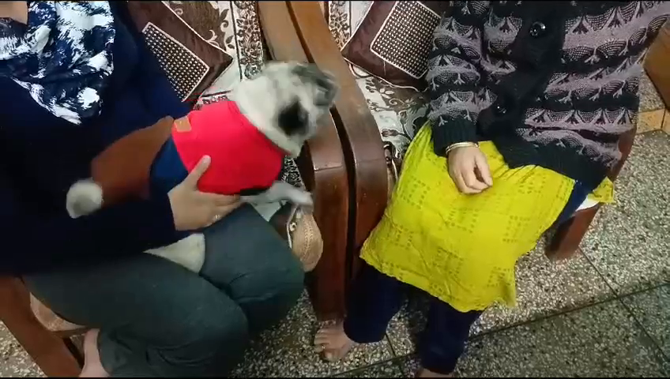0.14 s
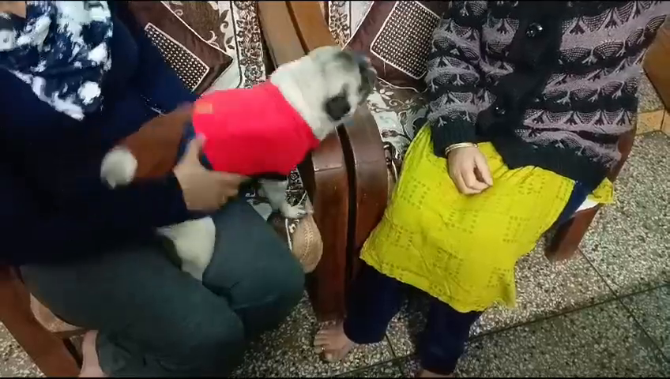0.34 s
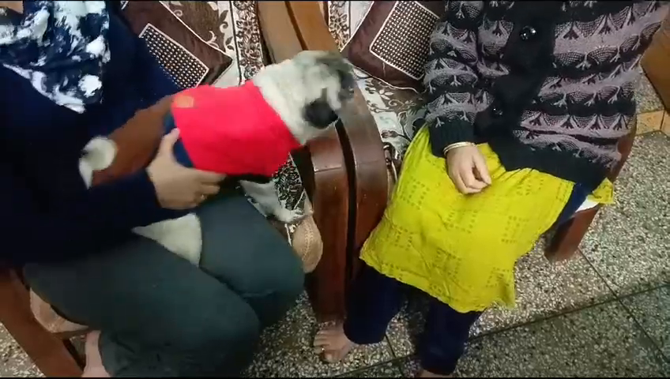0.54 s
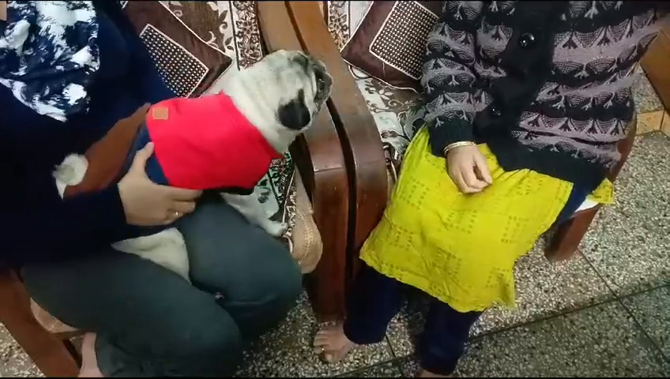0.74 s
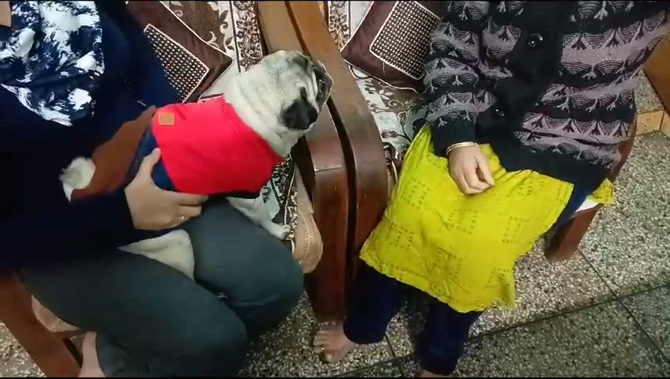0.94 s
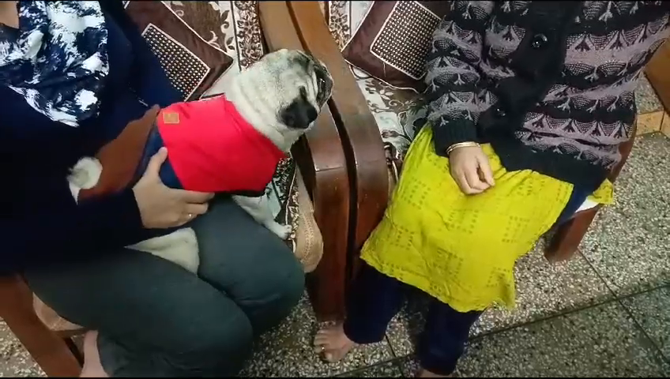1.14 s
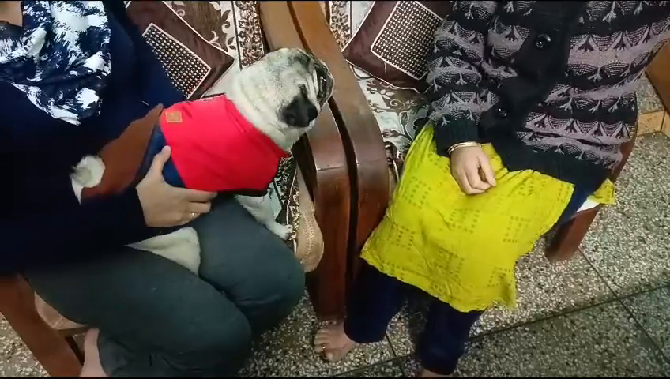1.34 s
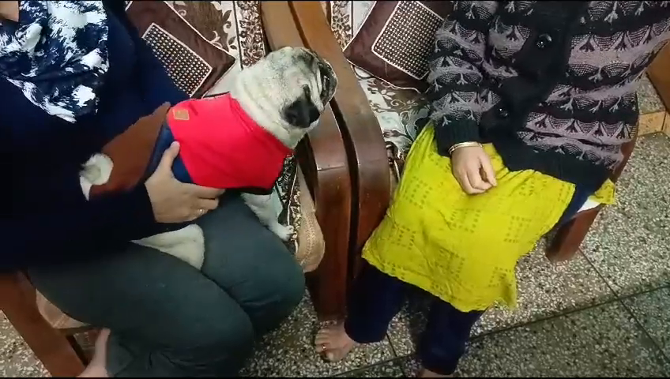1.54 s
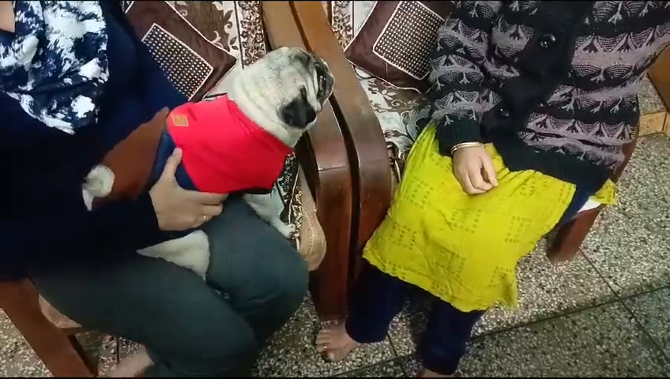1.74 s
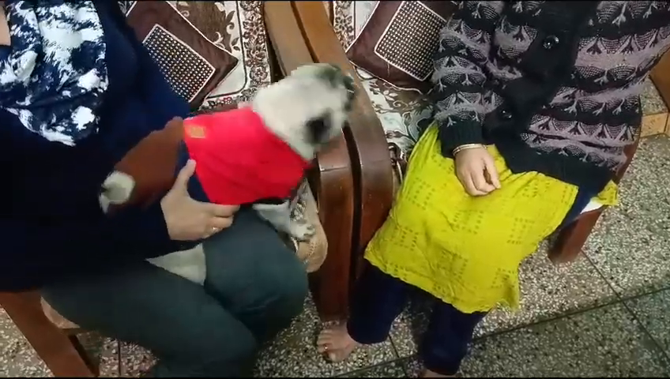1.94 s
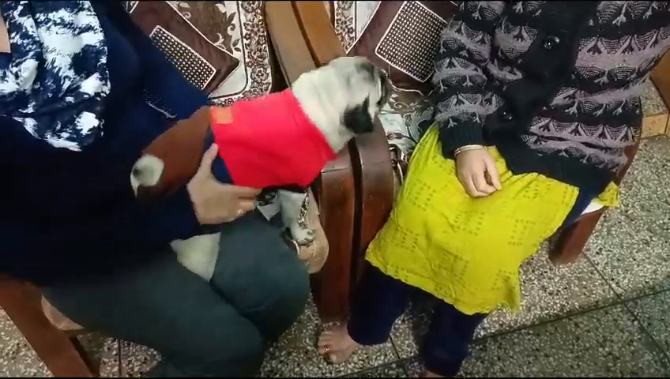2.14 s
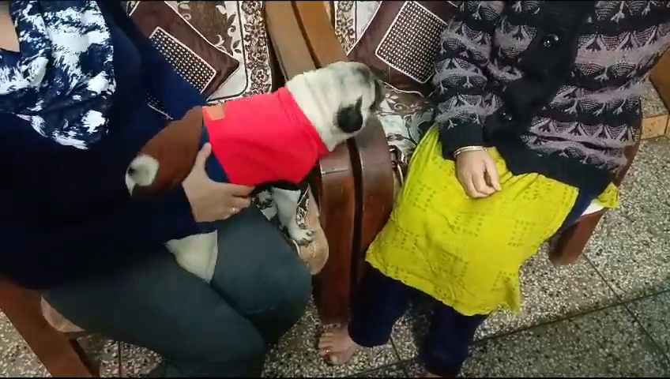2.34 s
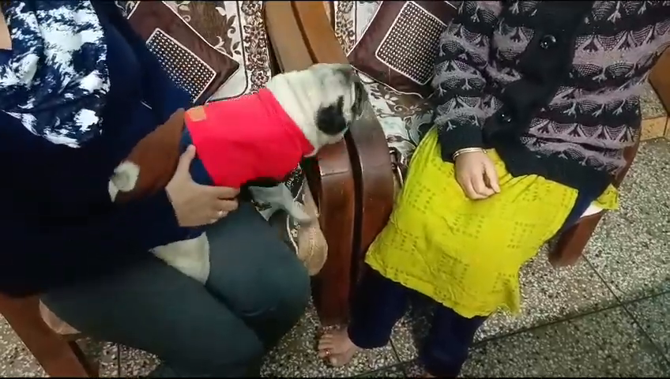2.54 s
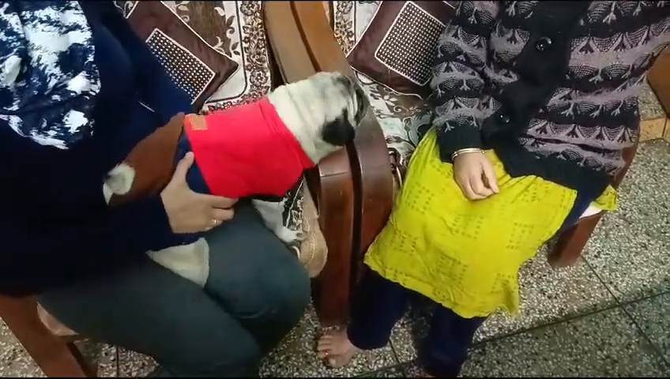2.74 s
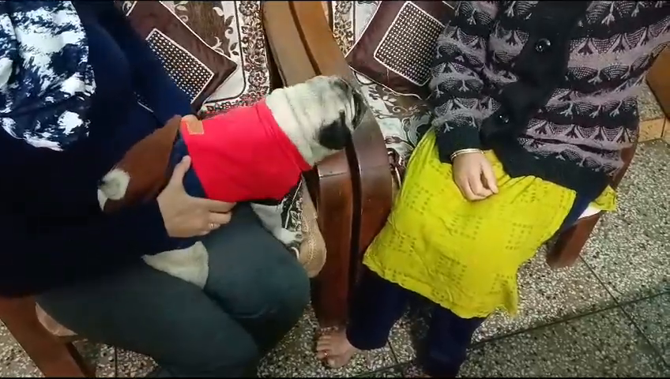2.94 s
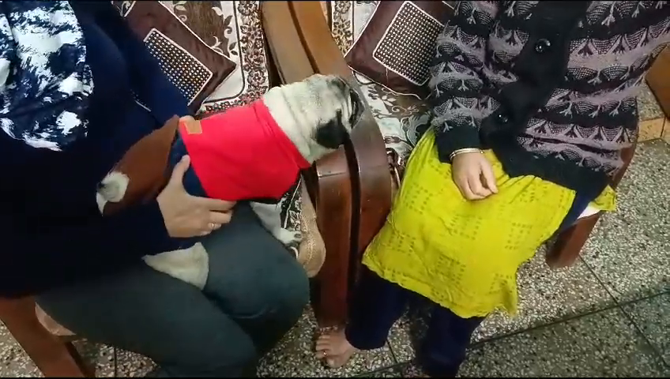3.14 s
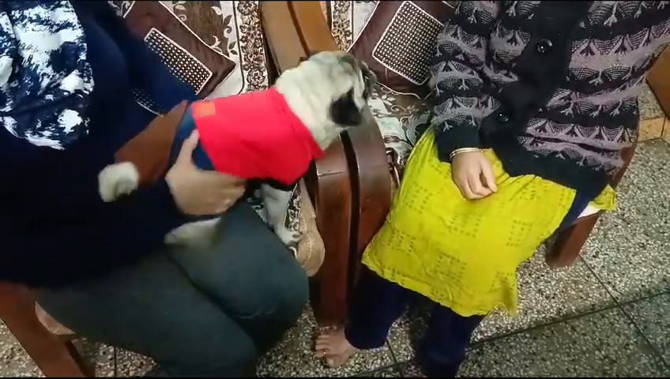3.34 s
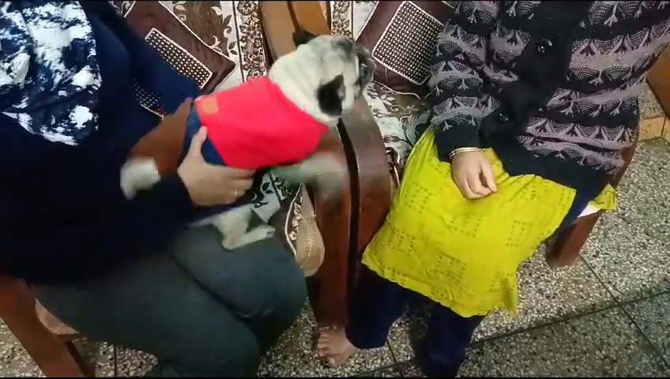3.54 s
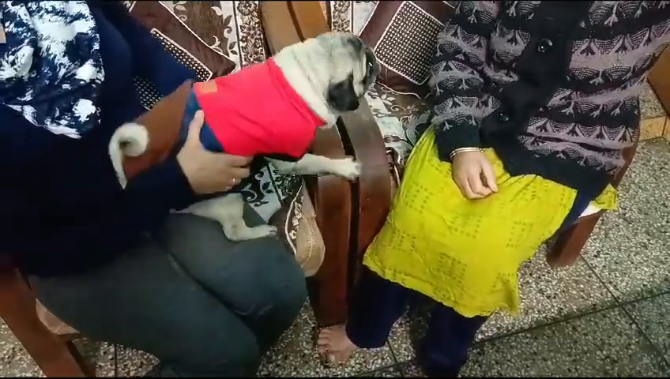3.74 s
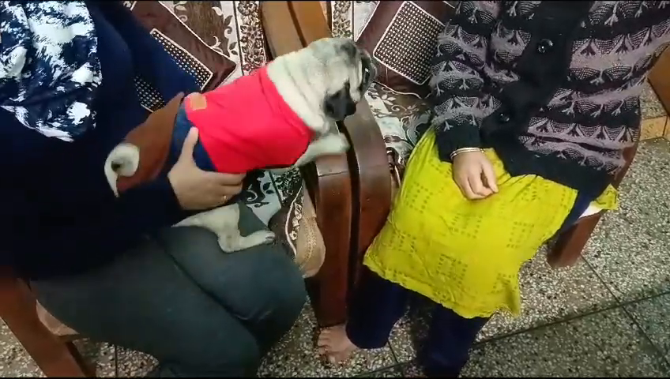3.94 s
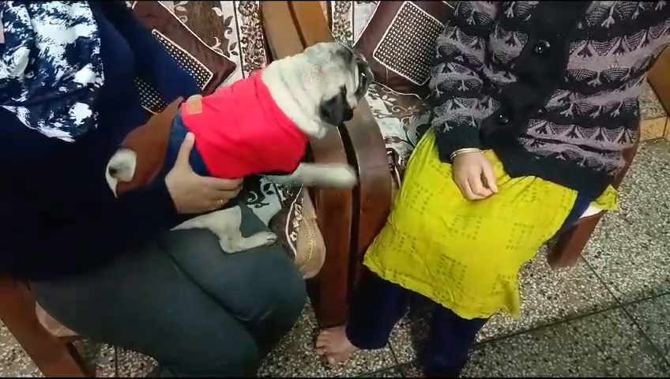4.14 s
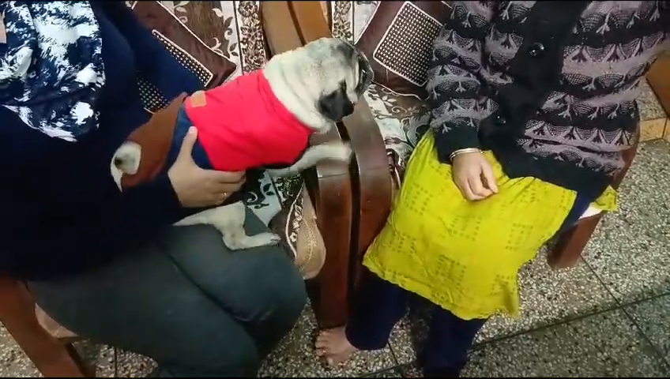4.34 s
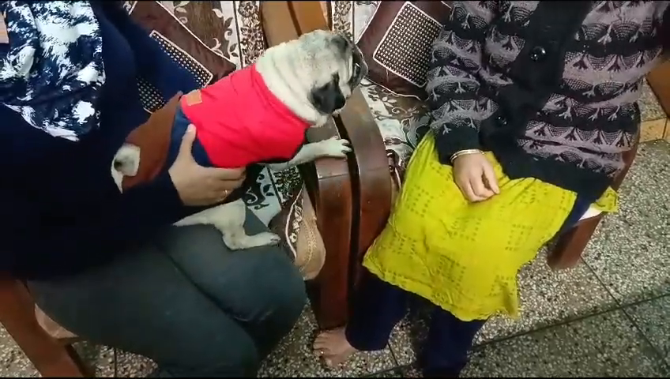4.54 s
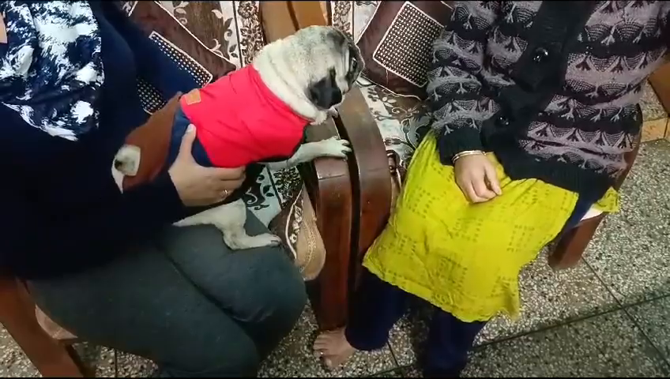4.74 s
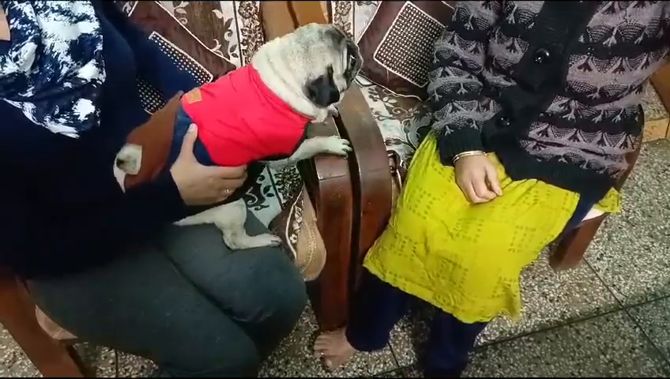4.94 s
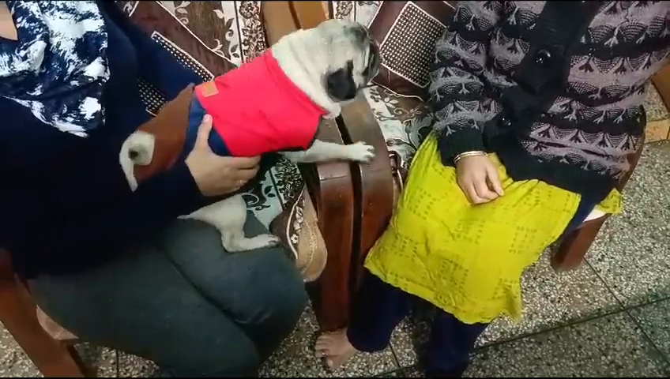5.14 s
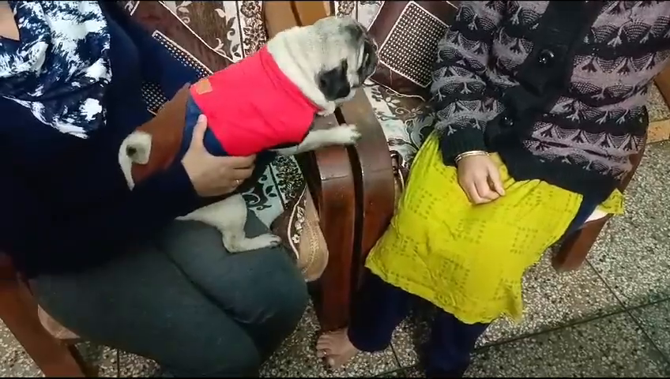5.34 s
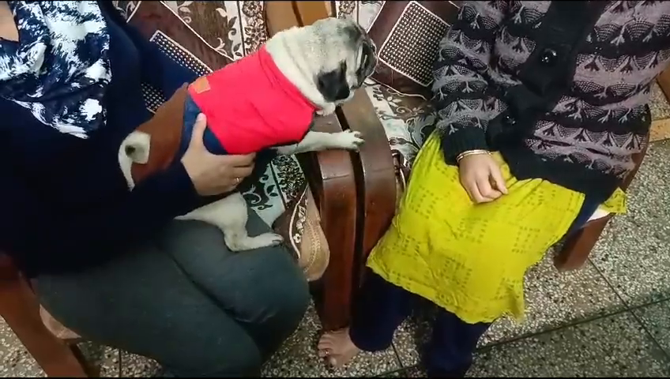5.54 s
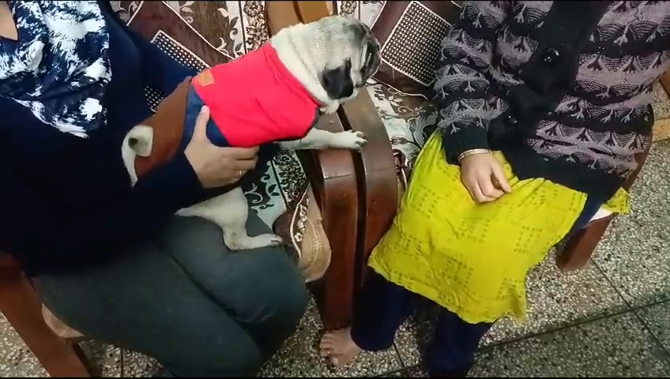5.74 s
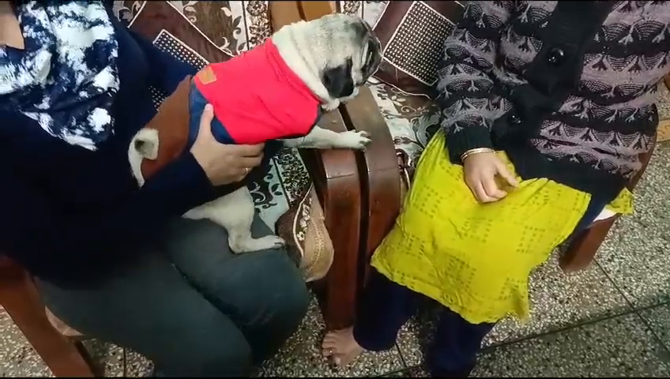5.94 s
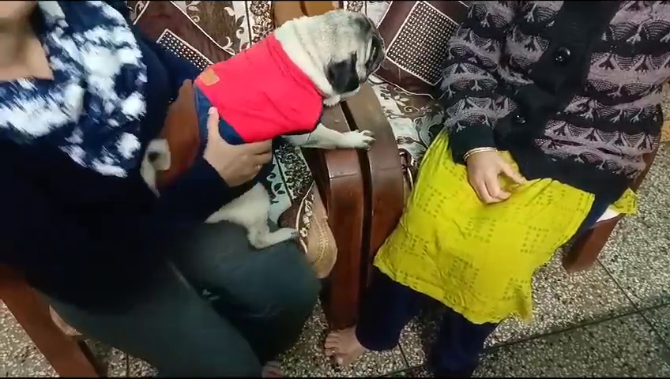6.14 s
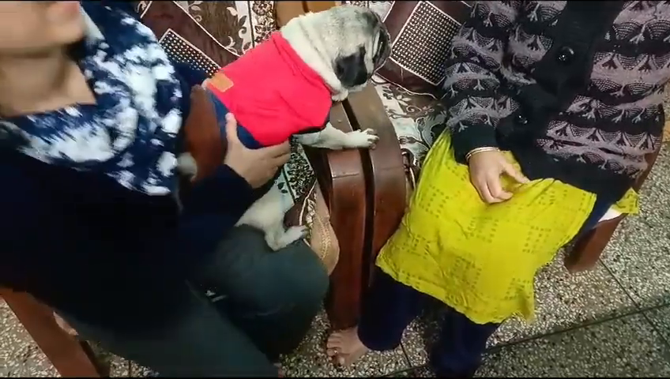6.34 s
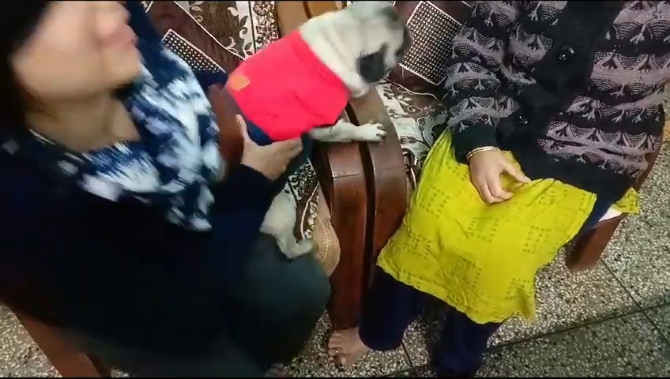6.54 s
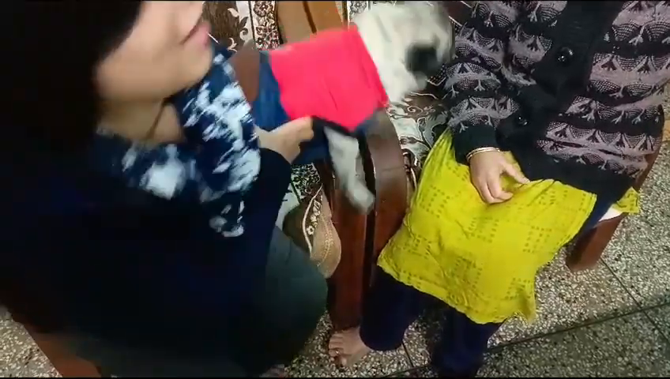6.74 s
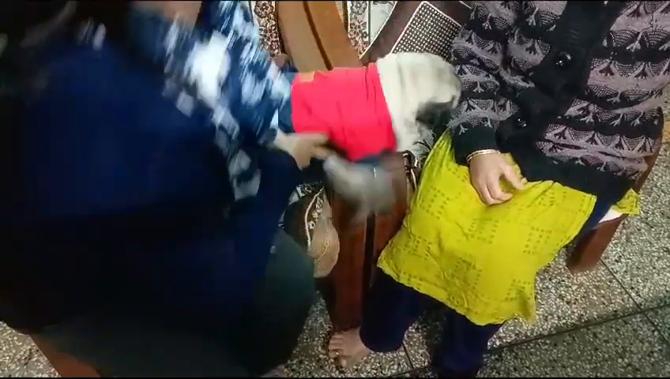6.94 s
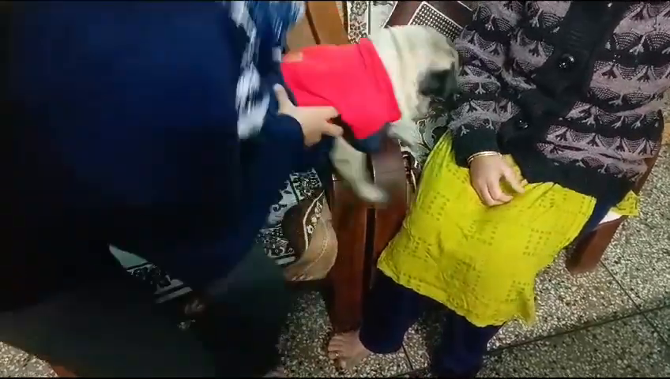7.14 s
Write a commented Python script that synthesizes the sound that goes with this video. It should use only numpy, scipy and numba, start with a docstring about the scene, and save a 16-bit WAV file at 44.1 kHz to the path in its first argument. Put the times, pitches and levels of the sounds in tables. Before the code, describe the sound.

A small short-nosed dog is close, slightly right, in a hard-floored living room with short ringing echoes and faint air. At 0.2 s it fires three hoarse rising yelps, the last longer, sinking into a low growl by 1.0. From 1.1 to 1.95 it puffs, grumbles and snores in with a fluttering rattle and sharp snorts at 1.4 and 1.7. A second bout of three yelps runs 2.1-2.85, growling between, then a breathy pant with thin whistles. The third and loudest bout, 3.3-3.95, drops to a deep grumble and snort at 4.1. A quieter gap has puffs, a tiny lip click at 4.5, two soft microphone knocks at 4.7 and 4.9 on the right, and palate ticking. At 5.05 two yelps drag into a long wavering growl until 5.95. After a panting snort, yelps at 6.5 and 6.7 fall to low growling, with one last bark at 7.1.

```python
"""A pug barks in five bouts in a hard-floored living room, each bout sinking into a growl.
Every bark is a hoarse rising yelp: vocal fold pulses and a rattling palate drive mouth, chest, nose and teeth.
Between bouts it pants and grumbles (coloured noise), snores through its short nose (chopped air in resonances),
whistles, smacks its lips and flutters its palate. A finger bumps the microphone twice, ringing its case.
Room echoes, ringing room notes and quiet air surround the dog."""
import sys
import numpy as np
from scipy import signal
from scipy.fft import rfft, irfft, next_fast_len
from scipy.io import wavfile
from scipy.ndimage import uniform_filter1d, minimum_filter1d
from numba import njit

SR = 44100
rng = np.random.default_rng(int(sys.argv[2]) if len(sys.argv) > 2 else 0)


def dump_mix(stems):
    """Bounce the given channels to the path in sys.argv[1] as a 16-bit WAV at rate SR."""
    frames = np.atleast_2d(stems).T  # one column per channel
    limited = np.clip(frames, -1, 1)  # hard clip at full scale
    pcm = np.round(limited * 32767).astype(np.int16)
    wavfile.write(sys.argv[1], SR, pcm)


N = 321444
TIME = np.arange(N) / SR
TICKS = np.arange(0, N + 40, 40) / SR   # control times [s], one every 40 samples

# colour of the dog's breath noise: (frequency [Hz], gain [dB])
BREATH_COLOUR = [(290, -75.5), (500, -13), (625, -5.5), (873, -15.5), (1030, -3.5), (1310, 0.5),
                 (2020, -5.5), (2220, -10.5), (2700, -22), (4790, -19.5), (6240, -34), (6780, -23),
                 (14000, -74)]
BREATH_ATTACK_S, BREATH_RELEASE_S = 0.0084, 0.04
SNORE_ATTACK_S, SNORE_RELEASE_S = 0.017, 0.022


def from_db(db):
    """Decibels to gain."""
    return 10 ** (np.asarray(db) / 20)


def rms_one(x):
    """Scale to rms 1."""
    return x / np.sqrt(np.mean(x ** 2) + 1e-20)


def in_time(rows):
    """Each column of a curve at every sample."""
    s, *columns = np.transpose(rows)
    return [np.interp(TIME, s, c) for c in columns]


def at_hz(points, hz, axis=1):
    """Read a column of a spectrum on a log-frequency axis."""
    points = np.array(points, float)
    return np.interp(np.log(np.maximum(hz, 1)), np.log(points[:, 0]), points[:, axis])


def colour(x, points, axis=1):
    """Filter by a smooth spectrum."""
    size = next_fast_len(N + 4096)
    gain = from_db(at_hz(points, np.fft.rfftfreq(size, 1 / SR), axis))
    return irfft(rfft(x, size) * gain, size)[:N]


def drift(rate):
    """Random wander of rms 1, with about rate turns a second."""
    return rms_one(np.interp(TIME * rate, np.arange(20000), rng.standard_normal(20000)))


def even(x, window_s):
    """Hold the level at rms 1, leaving faster flutter alone."""
    size = max(int(window_s * SR), 2)
    power = uniform_filter1d(uniform_filter1d(x ** 2, size), size)
    return x / np.sqrt(np.abs(power) + 1e-12)


def resonate(x, hz, width_hz):
    """One resonance with gain 1 on top."""
    r = np.exp(-np.pi * width_hz / SR)
    zeros = np.array([1, 0, -1]) * (1 - r * r) / 2
    return signal.lfilter(zeros, [1, -2 * r * np.cos(2 * np.pi * hz / SR), r * r], x)


@njit
def glide(x, angle, r):
    """A resonance whose centre (radians a sample) moves."""
    out, state = np.zeros(len(x)), 0j
    for i in range(len(x)):
        state = state * r * np.exp(1j * angle[i]) + x[i]
        out[i] = 2 * (1 - r) * state.real
    return out


def glide_hz(x, hz, width_hz):
    """A moving resonance, gain 1 on top."""
    return glide(x, 2 * np.pi * hz / SR, np.exp(-np.pi * width_hz / SR))


def envelope(start, length, attack_s, release_s):
    """Attack, hold and dying release, at every control tick."""
    age = TICKS - start
    return np.clip(age / attack_s, 0, 1) * np.exp(-np.maximum(age - length, 0) / release_s)


def blend(gestures):
    """Join gestures (gain, control, ..): their powers add, and the controls ease toward the loudest."""
    ease_s = .026   # averaging window, passed twice, in which throat and mouth change shape
    gain, *controls = np.swapaxes([np.broadcast_arrays(*gesture) for gesture in gestures], 0, 1)
    size = max(int(ease_s / TICKS[1]), 2)
    lead = np.abs(uniform_filter1d(uniform_filter1d(gain ** 3, size), size)) + 1e-30
    led = [np.average(control, axis=0, weights=lead) for control in controls]
    return in_time(np.transpose([TICKS, np.linalg.norm(gain, axis=0), *led]))


def breaths(rows, attack_s, release_s):
    """Gain and further controls of a run of breaths, from rows (start, length, level, ..)."""
    return blend([(from_db(db) * envelope(s, length, attack_s, release_s), *rest)
                  for s, length, db, *rest in rows])


def flutter(rate_hz, unevenness, open_share, swing_db):
    """Air chopped into uneven puffs by flapping soft tissue."""
    cycle = np.cumsum(rate_hz * np.exp(unevenness * drift(rate_hz))) / SR
    strength = from_db(swing_db * rng.standard_normal(8000))[cycle.astype(int) % 8000]
    puff = np.exp(-(cycle % 1) / open_share)
    return rms_one(rng.standard_normal(N) * strength * puff)


def quiet_air():
    """Steady coloured noise, independent in the two ports."""
    # colour of the background air: (frequency [Hz], gain [dB])
    floor_colour = [(18, -83.5), (30, -18.5), (267, -4.5), (859, -17.5), (1340, -5.5), (2990, -16),
                    (4780, -35), (7240, -34.5), (8250, -30), (15000, -48.5)]
    return from_db(-63.0) * np.array([rms_one(colour(rng.standard_normal(N), floor_colour)) for side in range(2)])


def panting():
    """With the mouth half closed the dog puffs coloured air and grumbles low in its throat with a wavering moan."""
    # puffs of breath: (start [s], length [s], level [dB])
    puffs = [(-0.02, 0.077, -53.5), (1.08, 0.53, -49), (1.965, 0.053, -45.5), (2.89, 0.14, -43),
             (3.05, 0.15, -49), (4.085, .2, -41), (4.3, 0.2, -44), (4.64, 0.024, -55), (6.02, 0.15, -39.5),
             (6.2, 0.096, -46), (6.33, 0.095, -47)]
    # low throat grumbles: (start [s], length [s], level [dB])
    grumbles = [(1.07, 0.24, -51), (2.015, 0.031, -41.5), (2.88, 0.15, -44.5), (3.09, 0.13, -58.5),
                (4.11, 0.093, -37.5), (4.34, 0.058, -44.5), (4.47, 0.045, -52.5), (6.02, 0.12, -49.5),
                (6.155, 0.022, -40), (6.22, 0.088, -48.5)]
    # colour of the throat: (frequency [Hz], gain [dB])
    throat_colour = [(41, -72), (70, -13.5), (125, -9.5), (247, -9.5), (413, -15.5), (449, -41.5),
                     (626, -19), (900, -56.5), (1170, -75.5), (1980, -120)]
    moan_hz, moan_waver_share, moan_width_hz, moan_db = 265, 0.18, 33, 4.5   # level against the purr

    air_gain, = breaths(puffs, BREATH_ATTACK_S, BREATH_RELEASE_S)
    grumble_gain, = breaths(grumbles, BREATH_ATTACK_S, BREATH_RELEASE_S)
    air = even(colour(rng.standard_normal(N) * from_db(0.66 * drift(39)), BREATH_COLOUR), 0.027)
    purr = rms_one(colour(flutter(rate_hz=48, unevenness=0.34, open_share=0.39, swing_db=1.0), throat_colour))
    moan = rms_one(glide_hz(purr, moan_hz * np.exp(moan_waver_share * drift(13)), moan_width_hz))
    grumble = even(purr + from_db(moan_db) * moan, 0.015)
    return air_gain * air + grumble_gain * grumble


def jaw_opening(pitch_hz):
    """The jaw opens, 0-1, as the voice climbs."""
    return np.clip((pitch_hz - 250) / 650, 0, 1)


def folds(pitch_hz, clear, undertone, cycles, jitter, hoarse_jitter, shimmer_db, hoarse_shimmer_db):
    """Vocal fold pulses, more uneven when hoarse; one strong pulse in every few cycles gives an undertone."""
    waver_share, wavers_per_s = .015, 70   # the pitch never holds still
    wobble = (jitter + hoarse_jitter * (1 - clear)) * drift(420) + waver_share * drift(wavers_per_s)
    turns = np.cumsum(pitch_hz * (1 + wobble)) / SR
    pulses = np.diff(np.floor(turns), prepend=0)
    late = np.clip(turns % 1 / np.maximum(np.gradient(turns), 1e-6), 0, 1)
    strong = np.floor(turns) % np.maximum(np.round(cycles), 1) == 0
    pulses = pulses * np.where(strong, 1 + undertone, 1 - undertone)
    pulses = pulses * (1 - late) + np.roll(pulses * late, -1)   # each closure falls between two samples
    pulses = pulses * from_db((shimmer_db + hoarse_shimmer_db * (1.5 - clear)) * np.tanh(drift(170)))
    return even(signal.lfilter([1, -1], [1, -.98], pulses), .02)


def yelp(s, attack_s, length, db, swell_db, first_hz, top_hz, climb_s, clear, undertone, cycles, lips, mouth_hz,
         chest_db, nasal_db, nasal_hz, rasp_db, gape, teeth_hz, breadth, hollow):
    """One yelp: pitch and mouth resonance arch up together, then the sound breaks off into a thin whine."""
    # the pitch sinks more slowly than it rose; away from the top the yelp is hoarser
    sink_share, lowest_hz, hoarse_share = .6, 279.6, 0.3707
    release_s, whine_db, whine_release_s = .014, -9, .05
    # from start to end the sound leaves the chest, and the nasal ring rises
    chest_change_db, nasal_change_hz = -35, 316
    # as the mouth gapes the lips part, its resonance rises, and nose and teeth grow louder
    gape_lips, gape_hz, gape_nasal_db, gape_rasp_db = 0.55, 250, 9.5, 19.5
    mouth_follows_pitch, teeth_follow_pitch = 0.48, 1.7   # Hz of resonance per Hz of pitch

    age = np.maximum(TICKS - s, 0)
    from_middle = np.minimum(age / length, 1) - .5
    opened = gape * (np.sin(np.pi / 2 * (from_middle + .5)) - 2 / np.pi)   # quickly at first; zero on average
    below_top = (1 - age / climb_s) ** 2 * np.where(age < climb_s, 1, sink_share)
    body = envelope(s, length, attack_s, release_s)
    whine = from_db(whine_db) * envelope(s, length, attack_s, whine_release_s)
    gain = from_db(db + swell_db * from_middle) * np.maximum(body, whine)
    pitch_hz = np.maximum(top_hz - (top_hz - first_hz) * below_top, lowest_hz)
    above_middle_hz = pitch_hz - np.interp(s + length / 2, TICKS, pitch_hz)
    return (gain, pitch_hz,
            clear * (1 - hoarse_share * np.minimum(below_top, 1)), undertone, cycles,
            lips + gape_lips * opened,
            mouth_hz + mouth_follows_pitch * above_middle_hz + gape_hz * opened,
            chest_db + chest_change_db * from_middle,
            nasal_db + gape_nasal_db * opened,
            nasal_hz + nasal_change_hz * from_middle,
            rasp_db + gape_rasp_db * opened,
            teeth_hz + teeth_follow_pitch * above_middle_hz, breadth, hollow)


def growl(s, length, db, first_hz, last_hz, clear, lips, mouth_hz, chest_db, nasal_db, nasal_hz, rasp_db):
    """One growl: the lips hold still while the pitch slides; the hoarser it is, the more the period doubles."""
    attack_s, release_s, hollow_share = .014, .019, 0.35
    pitch_hz = np.interp(TICKS, [s, s + length], [first_hz, last_hz])
    jaw = jaw_opening(pitch_hz)
    teeth_hz, breadth = 3400 + 600 * jaw, 0.073 + 0.97 * jaw ** 3   # an open jaw rings higher and broader
    hollow = hollow_share * (1 - lips)   # narrow lips leave a hollow between nasal ring and rasp
    return (from_db(db) * envelope(s, length, attack_s, release_s), pitch_hz, clear, 1 - clear, 2,
            lips, mouth_hz, chest_db, nasal_db, nasal_hz, rasp_db, teeth_hz, breadth, hollow)


def barks():
    """Folds and rattling palate drive the mouth, the chest and the nose together, in yelps and growls."""
    # yelps: (start [s], attack [s], length [s], level [dB], swell from start to end [dB], first pitch [Hz],
    #   top pitch [Hz], climb [s], clearness [0-1], undertone [0-1], undertone period [cycles],
    #   lip opening [0-1], mouth resonance [Hz], chest level [dB], nasal ring before trim [dB],
    #   nasal ring [Hz], rasp before trim [dB], gape [0-1], teeth resonance [Hz], rasp breadth [0-1],
    #   depth of each of two hollow cuts [0-1]); swept controls are given at mid-yelp or on average
    yelp_rows = [ (0.203, 0.0045, 0.053, -14, 2, 383.2, 858.6, 0.1, 0.89, 0, 2, 0.06, 1788, -37.5, -6.5, 2280, -14.5, .1, 3580, 1, 0),
                 (0.351, 0.012, 0.063, -15, -1, 690.4, 1021, 0.058, 0.1, 0, 3, 0.07, 1670, -43, -11.5, 2360, -13.5, 0.2, 4700, 1, 0.2),
                 (0.532, 0.02, 0.18, -14, 5, 518.3, 1134, 0.16, 0.82, 0.24, 4, 0.4, 1522, -38.5, -16.5, 2700, -13.5, 0.1, 3830, 0.74, .2),
                 (2.08, 0.0087, 0.073, -11, 4.5, 784.9, 974.5, 0.11, 0.63, 0.9, 2, 0.07, 1613, -57, -4.5, 2056, -12, 0, 4430, 1, 0.1),
                 (2.268, 0.017, 0.12, -14, -1.5, 689.3, 1031, 0.15, 0.64, 0.4, 2, 0.14, 1522, -41.5, -20, 2240, -14.5, 0.1, 5010, 0.74, 0.3),
                 (2.534, 0.016, 0.16, -15, -1, 562, 989, 0.11, 0.55, 0.28, 2, 0.21, 1293, -31.5, -12.5, 2296, -13, 1, 4027, 0.38, 0),
                 (3.285, 0.0058, 0.008, -17.5, -0.5, 598.9, 702.2, 0.042, 0.49, 0.1, 2, 1, 1620, -29, -14.5, 2160, 1, 0.02, 3690, .6, 0.7),
                 (3.307, 0.0053, 0.043, -6.5, 1, 678.5, 728, 0.026, 0.56, 0.13, 3, 0.22, 1810, -34, -2, 2179, -9.5, 0, 3996, 0.75, 0.2),
                 (3.454, 0.0081, .1, -10.5, 9.5, 542.9, 997.9, .12, 0.83, 1, 2, 0.08, 1525, -45.5, -19.5, 2310, -16, 0.09, 4110, 0.63, 0),
                 (3.665, 0.014, 0.15, -15, -3, 598.2, 949.8, 0.11, .55, 0.29, 4, 0.18, 1517, -38, -33, 2520, -13.5, 0.4, 3360, .4, 0.6),
                 (5.043, 0.022, 0.11, -15, 5, 341.5, 904.5, .142, 0.42, 0.4, 2, 0.45, 1425, -33.5, -5.5, 2410, -14, 0.6, 3280, 0.6, 0.1),
                 (5.239, 0.055, 0.17, -15, -2, 648.7, 880.7, 0.13, 0.67, 0.38, 4, 0.12, 1313, -30, -6, 2940, -12.5, 0.3, 3330, .1, 0.56),
                 (6.499, 0.0069, 0.099, -17.5, -0.5, 745.5, 983, 0.11, 0.39, 0.94, 2, 0.1, 1636, -44.5, -0.5, 2100, -5, 0, 3970, .7, 0.2),
                 (6.694, 0.013, 0.15, -16.5, 0, 662.4, 927.7, 0.12, 0.54, 1, 2, 0.09, 1590, -40.5, -7, 2280, -11, .3, 4300, .4, 0.1),
                 (7.109, 0.028, 0.095, -11.5, 2, 695.6, 844, 0.057, 0.7, 0.2, 3, 0.1, 1634, -23, -63, 2370, -25, 0.1, 6360, 0.23, 0.5),
                 ]
    # growls between and after the yelps: (start [s], length [s], level [dB], first pitch [Hz],
    #   last pitch [Hz], clearness [0-1], lip opening [0-1], mouth resonance [Hz], chest level [dB],
    #   nasal ring before trim [dB], nasal ring [Hz], rasp before trim [dB])
    growl_rows = [ (0.281, 0.058, -20.5, 856.1, 717, .3, 0.8, 1814, -23, -3.5, 2396, -9.5),
                  (0.444, 0.075, -19, 951.6, 722, 0.21, 0.5, 1136, -25.5, -40, 2520, -10),
                  (0.753, 0.065, -21.5, 851.7, 728, 0.4, 0.6, 1220, -19.5, -20, 2460, -9.5),
                  (0.826, 0.084, -25, 421.2, 331, 0.09, 0, 1550, -9, -2.5, 2280, -17),
                  (0.894, 0.061, -23, 320, 290, 0.5, 0, 1410, -6, -6, 2125, -16.5),
                  (0.991, 0.015, -36, 266.4, 245, .7, 0.06, 1417, 7.5, -24, 2260, -14),
                  (1.977, 0.017, -36.5, 419.3, 389, 0.5, 0, 1553, -20.5, -46, 2360, -11.5),
                  (2.197, 0.081, -24, 1030, 899, 0.37, 0.5, 1260, -18, -19, 2480, -12),
                  (2.411, 0.11, -22.5, 1070, 944.5, .36, 0.3, 1320, -25.5, -16.5, 2890, -14),
                  (2.716, 0.059, -26, 889.8, 889.6, 0.5, 0.5, 1220, -30, -10.5, 2540, -10),
                  (2.78, 0.062, -30, 884.1, 664.7, .35, 0.5, 1190, -14, -4, 2380, -8),
                  (3.409, 0.049, -24.5, 909, 689.7, 0, 0.7, 2050, -26.5, -14, 2720, -6.5),
                  (3.6, 0.066, -21.5, 983.6, 760, 0.2, 0.4, 1550, -28.5, -24, 2580, -12.5),
                  (3.824, 0.09, -22, 873.9, 450.3, 0.43, 0.34, 1430, -16.5, -9, 3030, -13.5),
                  (3.936, 0.06, -17.5, 215.1, 181.8, 0.8, 0.16, 1363, -14, -59, 3000, -7.5),
                  (4.012, 0.028, -28.5, 185.6, 159.6, 0.92, 0, 1345, -2.5, -26, 2774, -16),
                  (5.178, 0.082, -22.5, 899.7, 755, 0.03, 1, 1840, -29, -7.5, 2710, -9.5),
                  (5.398, 0.096, -18.5, 846.2, 748, 0.5, 0.8, 1230, -32, -6.5, 2870, -17),
                  (5.5, 0.082, -19.5, 731.7, 569.3, 0.45, 1, 1684, -20.5, -5, 2505, -20),
                  (5.577, 0.095, -22.5, 577.1, 448.2, 0.4, 0.2, 2020, -14, -7.5, 2840, -44),
                  (5.675, 0.13, -19.5, 429.8, 378.4, .35, 0.26, 2060, -18, -1, 2724, -38),
                  (5.8, 0.11, -17.5, 550, 572.3, 0.5, 1, 1970, -19.5, -10, 2790, -21.5),
                  (5.918, 0.053, -28, 520.5, 482, 0, 0.3, 2050, -17.5, -12, 2680, -38),
                  (6.604, 0.063, -23.5, 987, 1053, 0.57, 0.5, 1160, -27, -1, 2750, -6),
                  (6.871, 0.057, -25, 896.4, 840, 0.3, 0.19, 1453, -24, -5.5, 2360, -7),
                  (6.929, 0.077, -24, 228.3, 224.9, 0.63, 0, 1420, -11, -2, 2100, -14.5),
                  (7.022, 0.1, -33.5, 228.6, 257.4, 0.65, 0.9, 1596, 5.5, -10.5, 2510, -16),
                  (7.101, 0.022, -21, 262.5, 287, 0.7, 0.3, 1455, 1, -33, 2414, -6),
                  (7.216, 0.063, -22, 561.8, 555, 0.65, 0.2, 1610, -3, -35, 2050, -16.5), ]
    # colours of mouth, chest and rasp: (frequency [Hz], gain [dB])
    mouth_colour = [(150, -60), (450, -30), (620, -15), (800, -4), (1000, 1), (1400, -2), (1900, -1),
                    (2200, -1), (2500, -12), (3300, -36), (9000, -75)]
    chest_colour = [(60, -18), (120, -16.5), (190, 7), (270, 7), (420, -0.5), (600, 1.5), (900, -27),
                    (1500, -97.5), (6000, -90.5)]
    rasp_colour = [(2400, -46.5), (3200, 1.5), (3700, -2.5), (4400, -5.5), (5300, -3.5), (6500, -8.5),
                   (7400, -17.5), (8300, -34), (15000, -51.5)]
    # fainter upper rings: (frequency [Hz], width of each of two passes [Hz], level on the untrimmed ring [dB])
    nasal_overtones = [(4690, 630, -27.5), (7040, 430, -29.5)]
    folds_over_rattle_db, hollow_hz, hollow_width_hz = 4.5, 2880, 480

    gestures = [yelp(*row) for row in yelp_rows] + [growl(*row) for row in growl_rows]
    (gain, pitch_hz, clear, undertone, cycles, lips, mouth_hz, chest_db,
     nasal_db, nasal_hz, rasp_db, teeth_hz, breadth, hollow) = blend(gestures)
    clear = np.clip(clear, 0, .97)
    jaw = jaw_opening(pitch_hz)
    tone = folds(pitch_hz, clear, np.clip(undertone, 0, 1), cycles, jitter=0.005014, hoarse_jitter=.038,
                 shimmer_db=4.5, hoarse_shimmer_db=8.5)
    rattle = flutter(rate_hz=120, unevenness=0.3, open_share=0.75, swing_db=0.5)
    throat = from_db(folds_over_rattle_db) * np.sqrt(clear) * tone + np.sqrt(1 - clear) * rattle

    # an open mouth radiates little below the fundamental
    voice = throat - 0.46 * jaw * glide_hz(throat, .6 * pitch_hz, width_hz=1040)
    # half closed it funnels the sound into one resonance; wide open it lets the whole band out
    funnel = voice
    for width_hz in (287, 1620, 3760):
        funnel = glide_hz(funnel, mouth_hz, width_hz)
    whole_band = np.clip(lips, 0, 1) * (0.87 + 2.24 * jaw) * voice
    pharynx = 0.032 * (1 - jaw) * resonate(voice, 1800, 190)   # the back of the throat rings in a growl
    mouth = even(colour(whole_band + funnel + pharynx, mouth_colour), 0.0052)

    chest = from_db(chest_db) * even(colour(throat, chest_colour), 0.059)

    nasal_ring = glide_hz(glide_hz(throat, nasal_hz, width_hz=640), nasal_hz, width_hz=470)
    nasal = from_db(nasal_db - 6.5) * even(nasal_ring, 0.0029)
    for hz, width, db in nasal_overtones:
        overtone = resonate(resonate(rattle, hz, width), hz, width)
        nasal = nasal + from_db(nasal_db + db) * even(overtone, 0.045)

    bright = colour(throat + 0.3 * rattle, rasp_colour)
    teeth = glide_hz(glide_hz(bright, teeth_hz, width_hz=800), teeth_hz, width_hz=900)
    rasp = from_db(rasp_db - 5.0) * even(np.clip(breadth, 0, 1) * bright + teeth, 0.04)

    shudder = from_db(1.46 * drift(70))   # the loose palate makes the whole voice judder
    sound = mouth + chest + nasal + rasp
    for _ in range(2):
        sound = sound - np.clip(hollow, 0, 1) * resonate(sound, hollow_hz, hollow_width_hz)
    return gain * shudder * sound


def whistles():
    """Air squeezed through the nostrils sings in narrow resonances that rise as the breath goes on."""
    # thin nose whistles: (start [s], length [s], level [dB], middle pitch [Hz])
    whistle_rows = [(1.133, 0.13, -58, 3990), (2.914, 0.11, -46.5, 4667), (2.942, 0.15, -45.5, 2223),
                    (4.123, 0.047, -48, 4366), (4.271, 0.041, -43.5, 2266), (6.092, 0.036, -54, 4490)]
    rise_share, width_share = 0.029, .08   # of the middle pitch; the width is that of each of two passes
    air, out = rng.standard_normal(N), 0
    for s, length, db, hz in whistle_rows:
        shape = envelope(s, length, BREATH_ATTACK_S, BREATH_RELEASE_S)
        gain = np.interp(TIME, TICKS, from_db(db) * shape)
        sung_hz = hz * (1 + rise_share * np.interp(TIME, [s, s + length], [-.5, .5]))
        sung = glide_hz(glide_hz(air, sung_hz, width_share * hz), sung_hz, width_share * hz)
        out = out + gain * even(sung, .03)
    return out


def snore():
    """The soft palate flaps in the in-breath and rings the narrow nose; now and then it snaps open."""
    # snoring in-breaths: (start [s], length [s], level [dB], tuning of the nose [ratio])
    in_breaths = [(1.262, 0.39, -39, 1), (1.39, 0.023, -32, 1.05), (1.46, 0.33, -42, 0.97),
                  (1.545, 0.029, -35.5, 1), (1.712, 0.043, -48.5, 1.19), (1.77, .16, -41, 0.956)]
    # snorts, where the palate snaps open: (time [s], level [dB], nasal share [0-1])
    snorts = [(1.262, -30.5, 0.7), (1.316, -36, 0.6), (1.395, -22, 1), (1.422, -27, 0.6), (1.714, -21, 0.5),
              (1.751, -33, 1), (1.98, -32, .05), (4.097, -26, 0.2), (4.514, -38.5, 0.8),
              (4.767, -49.5, 0.2), (6.06, -30.5, 0), (6.161, -26.5, 0.4)]
    # resonances of the nose: (frequency [Hz], width of each of two passes [Hz], level [dB])
    nose_rings = [(185, 143, 3.5), (618.2, 100, 4), (1076.6, 102, 14.5), (1650.3, 86, 3), (2362, 317, 1.5),
                  (3180, 530, -18.5), (4290.4, 2194, -17.5), (6399, 970, -13.5)]

    air = flutter(rate_hz=42, unevenness=.3, open_share=0.42, swing_db=2.2)
    gain, tuning = breaths(in_breaths, SNORE_ATTACK_S, SNORE_RELEASE_S)
    flare = tuning + 0.023 * drift(6.1)   # the nostrils move, and the resonances with them
    nose = from_db(-37) * air
    for hz, width, db in nose_rings:
        nose = nose + from_db(db) * glide_hz(glide_hz(air, hz * flare, width), hz * flare, width)
    nose = even(signal.sosfilt(signal.butter(4, 7200, fs=SR, output="sos"), nose), 0.058)
    puff = rms_one(colour(rng.standard_normal(N), BREATH_COLOUR))
    out = gain * nose
    for s, db, nasal in snorts:
        age = np.maximum(TIME - s, 0)
        snap = (1 - np.exp(-age / 0.0016)) * np.exp(-age / 0.0066)
        out = out + from_db(db) * snap * (nasal * nose + (1 - nasal) * puff)
    return out


def smacks():
    """The wet lips part with a short bright click of band-passed noise."""
    # wet clicks of the lips: (time [s], level before the band-pass [dB])
    clicks = [(1.993, -46.5), (4.514, -41.5)]
    decay_s = .008
    gain = sum(from_db(db) * (TIME > s) * np.exp(-np.abs(TIME - s) / decay_s) for s, db in clicks)
    band = signal.butter(2, [3000, 11000], "band", fs=SR, output="sos")
    return signal.sosfilt(band, gain * rng.standard_normal(N) + 1e-18)


def bumps():
    """Soft finger knocks ring the microphone case, almost wholly in the right port."""
    # finger knocks: (time [s], level before the port gains [dB], upper band edge [Hz])
    knocks = [(4.72, -20.5, 1130), (4.889, -21, 270)]
    # modes of the case: (frequency [Hz], level [dB], t60 [s])
    case_modes = [(115, -5, 0.066), (143.5, 3, 0.052), (290, -12.5, 0.025), (426, -0.5, 0.028)]
    age, out = TIME[:SR // 4], np.zeros(N)
    ring = sum(from_db(db - 60 * age / t60) * np.sin(2 * np.pi * hz * age) for hz, db, t60 in case_modes)
    ring = ring + from_db(5 - 60 * age / 0.012) * rng.standard_normal(len(age))   # contact noise
    for s, db, bright_hz in knocks:
        band = signal.butter(2, [75, bright_hz], "band", fs=SR, output="sos")
        out[int(s * SR):int(s * SR) + len(age)] += from_db(db) * signal.sosfilt(band, ring)
    return out * from_db([[-30], [2]])   # left, right


def palate():
    """Slow separate flaps of the palate tick in the closed mouth before one bout."""
    # flutters: (start [s], length [s], level [dB])
    flutters = [(4.812, 0.29, -50)]
    # what they ring: (frequency [Hz], width of the first pass [Hz], level [dB])
    palate_rings = [(500, 190, -9), (1040, 90, -6), (1300, 58, -8.5), (2050, 100, -7.5), (2720, 79, -12)]
    gain, = breaths(flutters, SNORE_ATTACK_S, SNORE_RELEASE_S)
    flaps = flutter(rate_hz=34, unevenness=0.24, open_share=0.26, swing_db=4.5)
    ticking = sum(from_db(db) * resonate(resonate(flaps, hz, width), hz, 4 * width)
                  for hz, width, db in palate_rings)
    return gain * rms_one(ticking)


def room(x, early_t60, gap_s):
    """Near walls and floor give a quick cloud of echoes, the rest of the house a fainter tail."""
    # the room: (frequency [Hz], early reflections [dB], late tail [dB], tail t60 [s])
    room_bands = [(150, -11.5, -21.5, 0.77), (506, -8, -30, 0.16), (1674, -10, -18.5, 0.88),
                  (3630, 7, 3, 0.018), (9400, -14.5, -28.5, 0.21)]
    age, edges = TIME[:SR], np.geomspace(60, 16000, num=13)
    white, response = rng.standard_normal((2, 2, SR)), 0
    for k, (low, high) in enumerate(zip(edges, edges[1:])):
        hz = np.sqrt(low * high)
        band = signal.butter(2, [low, high], "band", fs=SR, output="sos")
        mid, side = signal.sosfilt(band, white[k % 2])
        alike = 1 / (1 + (hz / 800) ** 2)   # long waves reach both ports alike
        echoes = np.sqrt((1 + alike) / 2) * mid + np.sqrt((1 - alike) / 2) * side * [[1], [-1]]
        early_decay = from_db(-60 * age / early_t60) * (age > gap_s)
        late_decay = from_db(-60 * age / at_hz(room_bands, hz, axis=3)) * (age > gap_s)
        early = from_db(at_hz(room_bands, hz, axis=1)) * rms_one(early_decay)
        late = from_db(at_hz(room_bands, hz, axis=2)) * rms_one(late_decay)
        response = response + echoes * np.hypot(early, late) / np.sqrt(SR)
    return signal.fftconvolve(x[None], response, axes=1)[:, :N]


def ringing_notes(x):
    """Narrow resonances of the room ring on after the dog."""
    # notes of the room: (frequency [Hz], width [Hz], level [dB])
    note_rows = [(326, 8.8, -12.5), (782, 14, -4), (1069, 20, -12.5), (1076, 15, -6.5), (1299, 26, -4),
                 (1354, 22, 3), (1403, 37, -6), (1907, 28, -7.5), (2103, 19, -5.5), (3550, 19, 10.5),
                 (3690, 52, -0.5)]
    return sum(from_db(db) * resonate(x, hz, width) for hz, width, db in note_rows)


def through_ports(left, right):
    """The left port is shaded from the dog and the case combs it; what one port loses, the other gains."""
    # balance of the ports: (frequency [Hz], left minus right [dB])
    balance = [(150, 4), (300, 6.5), (700, 3.5), (1000, 2.5), (1400, -3), (2250, -15.5), (2700, 0.5),
               (3000, -10), (3300, -7), (3900, -19), (4900, -15), (6300, 5.5), (7200, 8), (8200, 10.5)]
    lift = [(hz, 20 * np.log10(2 / (1 + from_db(db)))) for hz, db in balance]
    return np.array([colour(colour(left, balance), lift), colour(right, lift)])


def limit(x, ceiling_db, hold_s):
    """Turn the gain down around each peak that would pass the ceiling."""
    size = max(int(hold_s * SR), 2)
    needed = np.minimum(1, from_db(ceiling_db) / (np.abs(x).max(axis=0) + 1e-9))
    return x * uniform_filter1d(minimum_filter1d(needed, size), size)


def overload(x, knee_db, top_db):
    """Only a sustained loud bark drives the input hard enough to flatten its peaks."""
    level = np.sqrt(np.abs(uniform_filter1d(x ** 2, size=900, axis=1)))
    strain = np.clip(10 * (level / from_db(knee_db) - 1), 0, 1)
    return x + strain * (np.clip(x, -from_db(top_db), from_db(top_db)) - x)


def scene():
    """The dog is nearer to the right port; room and quiet air surround it."""
    dog = barks() + snore() + panting() + whistles() + palate() + smacks()
    # the left port hears the dog later and weaker
    direct = np.array([from_db(-8.0) * np.interp(TIME - .00008, TIME, dog), dog])
    notes = ringing_notes(dog)
    air = quiet_air()
    echoes = room(dog, early_t60=0.19, gap_s=0.0037) * from_db([[2], [0]])
    left, right = direct + echoes + notes + air
    return through_ports(left, right) + bumps()


def record(dry):
    """The deep bass is cut, a limiter holds the loudest barks, which still crackle; the top is cut."""
    thin = signal.sosfilt(signal.butter(3, 66, "high", fs=SR, output="sos"), dry)
    held = limit(thin, ceiling_db=-.1, hold_s=.004)
    strained = overload(held, knee_db=-8.0, top_db=-3.0)
    # steep low-pass, 70 dB down from 16300 Hz up
    return signal.sosfilt(signal.cheby2(14, 70, 16300, fs=SR, output="sos"), strained)


dry = scene()
out = record(dry)
dump_mix(out)
```